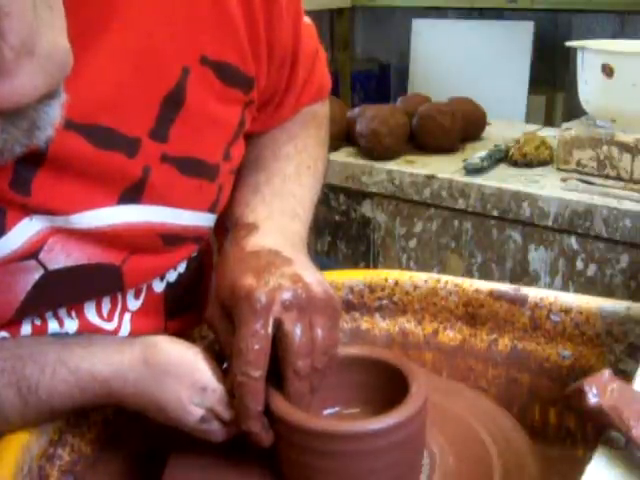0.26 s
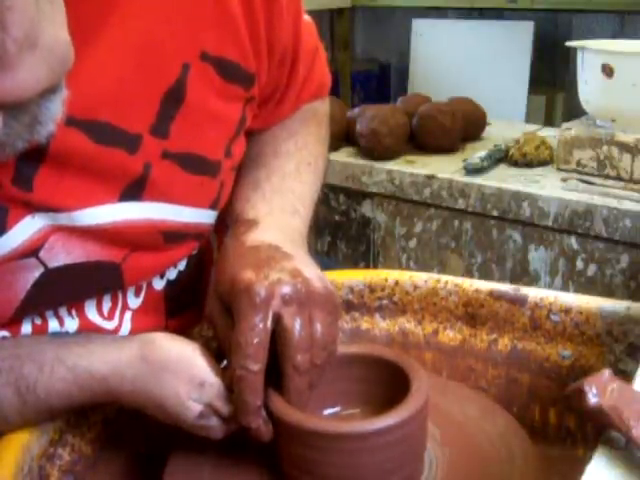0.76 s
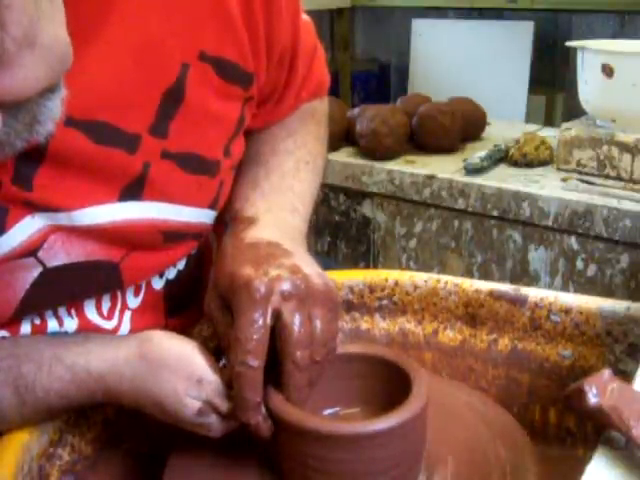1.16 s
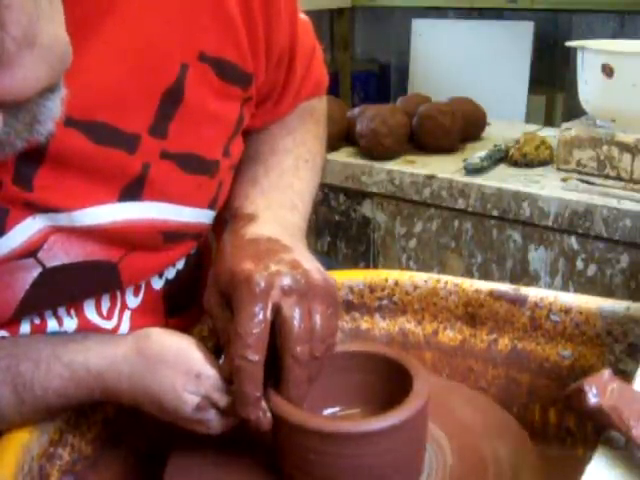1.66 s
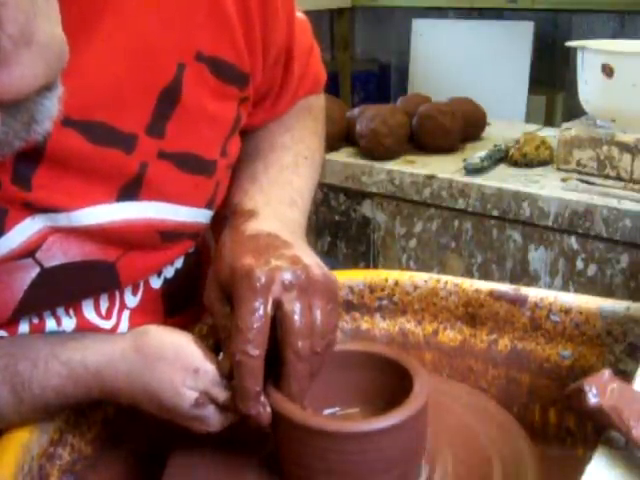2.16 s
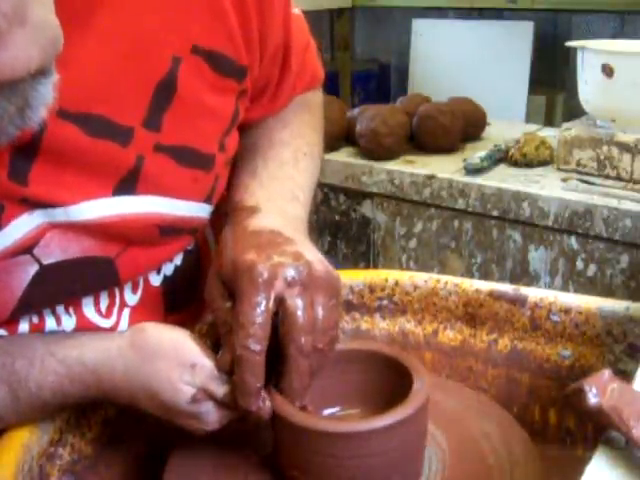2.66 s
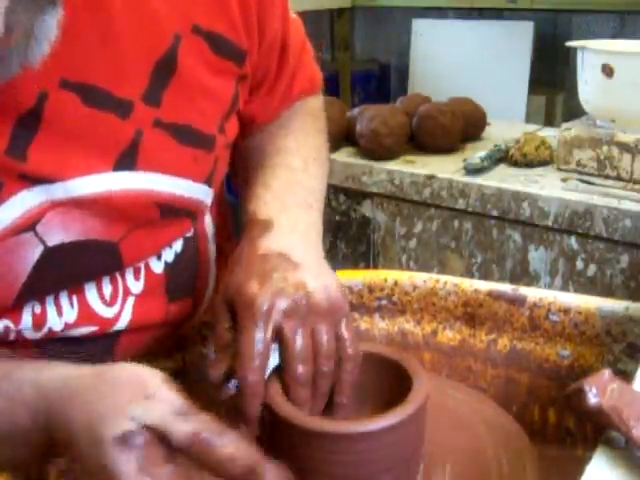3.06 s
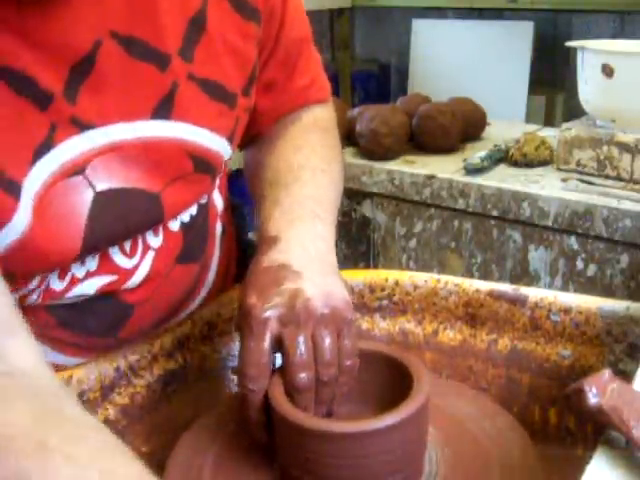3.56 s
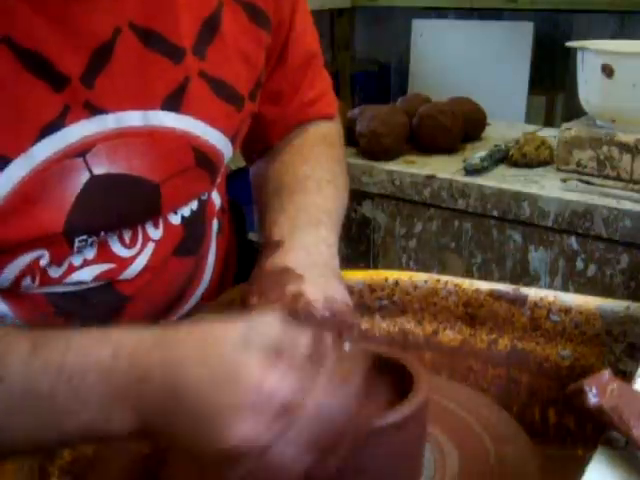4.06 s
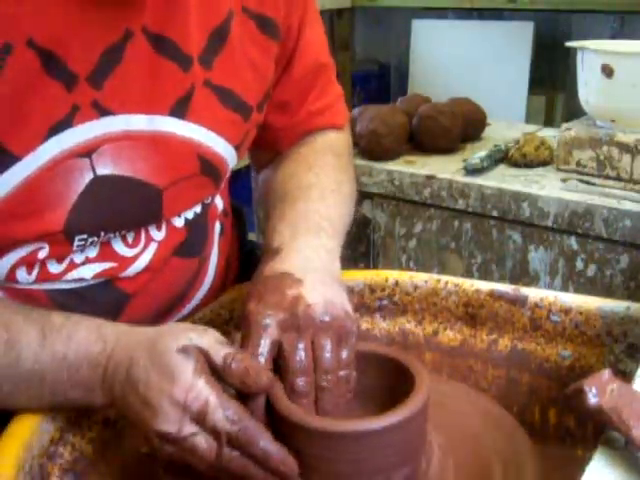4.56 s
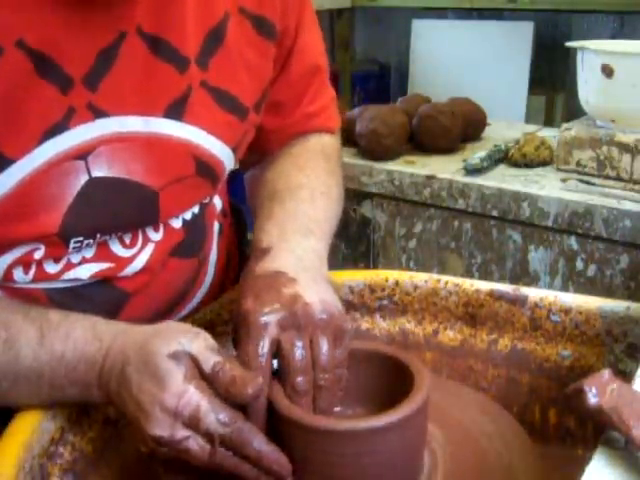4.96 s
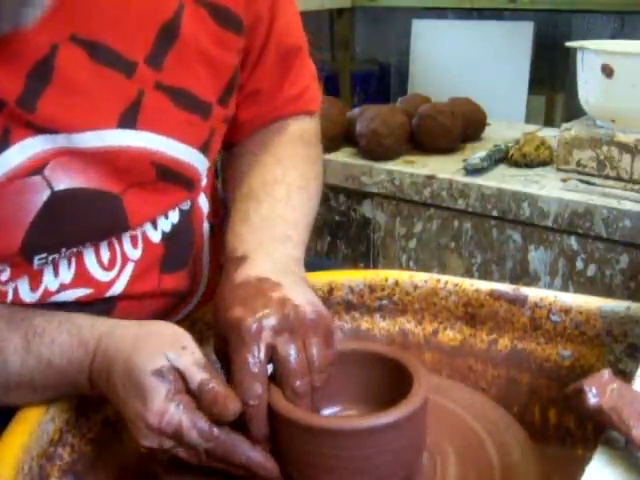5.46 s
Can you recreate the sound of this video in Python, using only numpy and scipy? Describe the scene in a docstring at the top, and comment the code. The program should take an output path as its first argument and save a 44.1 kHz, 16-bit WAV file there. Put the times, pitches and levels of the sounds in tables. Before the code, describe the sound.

A potter's wheel runs throughout: wavering mains hum, low rumble, light rapid tapping and irregular hard clacks shaking the splash pan. Small sticky snaps of wet clay appear over it, then a faint brushing stroke and a cluster of dull bumps past the middle. Hand hiss grows towards the end with a brief descending squeak. Indoor workshop air, mono, near the wheel, with limited treble.

```python
"""Pottery wheel in a small studio

An electric wheel hums on the mains (wavering sine tones) while its drive rumbles (noise through resonances).
Play in the drive makes it tap lightly and break into runs of hard knocks, each shaking the splash pan.
Soft thuds, plain smooth pushes, come about five times a second. Wet clay ticks and the arm bumps in short
noise bursts; shaped noise makes the hiss and swish of the hands and the squeaks of a changing grip."""
import sys
import numpy as np
from scipy import signal
from scipy.fft import rfft, irfft, next_fast_len
from scipy.io import wavfile
from scipy.ndimage import map_coordinates

SR = 44100
rng = np.random.default_rng(int(sys.argv[2]) if len(sys.argv) > 2 else 0)


def put_to_file(sound):
    """Save the sound as 16-bit audio at rate SR, in the file named by the first command-line argument."""
    columns = np.atleast_2d(sound).T  # one column per channel
    safe = np.clip(columns, -1, 1)
    whole_steps = np.round(safe * 32767)
    wavfile.write(sys.argv[1], SR, whole_steps.astype(np.int16))


N = 251370  # length in samples

# Steady air of the studio. Each row: frequency in Hz, relative level in dB.
AIR_COLOUR = [(20, -6), (50, -5), (72, 3.5), (92, 6.5), (125, -1), (400, -9), (600, -11), (760, -18),
              (1100, -20.5), (2000, -25), (4000, -31), (5300, -30), (7500, -33.5)]
# Dull bumps as the arm reaches over the pan. Each row: start in seconds, relative level in dB, top in Hz.
BUMPS = [(2.814, -41.5, 3600), (3.642, -40, 2600), (3.648, -36.5, 2100), (3.66, -45, 1300),
         (3.677, -42, 1900), (3.684, -39.5, 1400), (3.712, -40.5, 1300), (3.742, -43, 2420)]
# Tone colour of a bump's scuff. Each row: frequency in Hz, relative level in dB.
BUMP_COLOUR = [(30, -3), (70, -6), (300, 2), (550, 5.5), (800, 1), (1200, -0.5), (2000, -2), (3200, -5),
               (6000, -23)]
# Wet clay snapping off the fingers. Each row: start in seconds, peak of the snap in dB,
# hollow plop in dB relative to the snap before a shared trim, length of the tear in seconds.
TICKS = [(1.5815, -36.5, -6, .008), (1.78, -36, -5, .007), (1.881, -36.5, -4, .004),
         (2.121, -35.5, -6.5, 0.006), (2.2895, -35, -4, 0.0035), (2.481, -35.5, 0.5, .005),
         (2.713, -40.5, -4, .007), (2.885, -35.5, -2.5, 0.0063), (3.126, -39, 1.5, 0.0046),
         (4.269, -43, -2, .005), (4.2964, -38.5, 0, .009), (4.52, -37.5, -17, 0.0025),
         (4.6894, -28.5, -16, 0.00623), (4.8906, -38.5, -2, .004), (5.112, -33.5, -4, .012),
         (5.252, -41, 6, 0.0054), (5.4867, -29, -9, 0.005)]
# Tone colour of a tick. Each row: frequency in Hz, relative level in dB.
TICK_COLOUR = [(500, -28), (1500, -1.5), (2800, 1.5), (4000, 5.5), (5600, 1.5), (7400, 0), (9000, -23.5)]
# Pressure of the fingers on the wet wall. Each row: time in seconds, level of the hiss in dB.
FINGER_PRESSURE = [(2.62, -83), (2.85, -63.5), (3.55, -64), (3.85, -68), (4.2, -77), (4.42, -58),
                   (4.95, -59.5), (5.2, -56.5), (5.33, -53), (5.56, -54), (5.61, -55.5), (5.7, -50.5)]
# Tone colour of the hiss. Each row: frequency in Hz, relative level in dB.
SLIP_COLOUR = [(500, -2.5), (1500, 1.5), (2500, 1), (3900, 2.5), (5600, -2), (6400, -1.5), (7200, -2.5),
               (9000, -22)]
# Tone colour of the swish. Each row: frequency in Hz, relative level in dB.
SWISH_COLOUR = [(1200, -14), (2300, 3.5), (3200, -1), (3900, 2.5), (4600, -6.5), (5500, 0), (7000, -2),
                (8200, -17.5)]
# Thin squeaks of wet clay. Each row: start in seconds, length in seconds, start pitch in Hz,
# end pitch in Hz, width in Hz, level in dB.
SQUEAKS = [(2.765, .11, 3900, 4030, 200, -62.5), (2.87, .3, 4140, 4000, 260, -66.5),
           (3.15, 0.29, 4100, 3900, 220, -65), (3.439, 0.162, 3960, 3750, 220, -66.5),
           (5.29, .11, 3200, 3800, 550, -59.5), (5.44, 0.12, 4300, 4020, 300, -56.5),
           (5.638, 0.048, 6800, 7160, 550, -55)]
# One long falling squeak as the grip tightens. Each row: time in seconds, pitch in Hz, level in dB.
FALLING_SQUEAK = [(5.19, 6290, -94.5), (5.24, 6050, -57), (5.3, 5830, -53.5), (5.37, 5630, -51),
                  (5.43, 5430, -55.5), (5.5, 4990, -54), (5.545, 4105, -56), (5.577, 3780, -47),
                  (5.595, 2930, -55), (5.62, 2310, -95)]
# Motor hum. Each row: frequency in Hz, level in dB (rms, before wavering and, for the lowest, the swell).
HUM = [(100.1, -41), (200.2, -46), (300.3, -51), (400.4, -65), (500.5, -60), (600.6, -63), (700.7, -73),
       (1001, -77), (1701.7, -80.5), (1801.8, -72.5), (1901.9, -81.5), (2002, -86.5)]
# Thin whine of the motor. Each row: frequency in Hz, level in dB (rms, before wavering).
WHINE = [(5750, -85.5), (7597, -81), (8403, -91.5)]
# Slow swell of the lowest hum tone. Each row: time in seconds, change of level in dB.
HUM_SWELL = [(0, 1.5), (1.1, 0), (1.6, -1), (2.2, -1), (2.8, -3.5), (4.4, -2), (5.3, -3.5), (5.7, -2.5)]
# Soft thuds of the running wheel. Each row: middle in seconds, relative level in dB.
THUDS = [(0.048, -33), (0.319, -37), (0.543, -41), (0.718, -38), (0.847, -37), (1.05, -40), (1.195, -42),
         (1.384, -34), (1.65, -31), (1.803, -42), (2.049, -33), (2.182, -43), (2.394, -35), (2.644, -40),
         (2.928, -38), (3.056, -38), (3.384, -37), (3.517, -31), (3.657, -33), (4.019, -42), (4.186, -35),
         (4.382, -43), (4.52, -41), (4.712, -42), (4.887, -35), (5.051, -39), (5.246, -35.5), (5.393, -37),
         (5.556, -38)]
# Resonances of the housing and splash pan. Each row: frequency in Hz, width in Hz, relative level in dB.
PAN = [(162.6, 15, -9.5), (189.8, 11.1, -2.5), (250.4, 14.2, -0.5), (280.7, 21.8, -2.5), (305, 19.9, 1.5),
       (332.7, 14.9, 1.5), (387.6, 21.5, -10), (489.6, 21.8, -5), (552, 29, -24), (619, 34, -18)]
# Resonances of the drive's metal. Each row: frequency in Hz, width in Hz, relative level in dB.
METAL = [(898, 46, -5.5), (1334, 89, 2), (1508, 111, -1.5), (1791, 75, -9), (2578, 39, -14.5),
         (2880, 60, -7), (3203, 44, -7.5), (3820, 200, -17.5)]
# How hard the rolling drive shakes. Each row: time in seconds, strength in dB on its own scale.
DRIVE_SHAKE = [(0.0, -31), (0.35, -32), (0.45, -37), (1.1, -39.5), (1.17, -33), (1.38, -28.5),
               (1.47, -39.5), (1.62, -30.5), (1.74, -35.5), (2.25, -33), (2.65, -34), (2.8, -37.5),
               (3.15, -41), (3.3, -33), (3.46, -35), (3.65, -32), (4.28, -33.5), (4.6, -31), (5.3, -31),
               (5.5, -27.5), (5.7, -30.5)]
# Knocks as the drive jumps in its play. Each row: time in seconds, level of the clack in dB (rms of its
# opening), level of the zing in dB relative to the clack.
KNOCKS = [(0.0559, -46.0, -5), (0.094, -45, -12), (0.1289, -48.5, -5), (0.161, -49, -16),
          (0.2099, -50, -19), (0.2457, -48.5, -14), (0.2749, -44.5, -10), (0.316, -43, -4),
          (0.3519, -43.5, -11.5), (0.386, -54.5, -14), (0.458, -54.0, -2), (0.4838, -50.5, -4.5),
          (0.511, -51, -11), (0.707, -56, -22), (0.789, -56, -15), (0.967, -55, -8), (0.996, -53.5, -14),
          (1.1528, -49, -5.5), (1.2274, -47.5, -9), (1.262, -48.5, -6), (1.2892, -47.5, -8),
          (1.329, -44, -6), (1.3653, -45.0, -6.5), (1.393, -52, -10), (1.473, -49, -12),
          (1.508, -53.0, -18), (1.541, -52, -10), (1.5832, -47.5, -12), (1.6131, -44.5, -8.5),
          (1.708, -50.5, -17), (1.755, -52.5, -11), (1.786, -50.5, -6), (1.8271, -44.5, -11),
          (1.8625, -45.5, -9), (1.9807, -48.5, -11), (2.0236, -48, -6.5), (2.0853, -46, -10),
          (2.1173, -48.5, -8), (2.1487, -50.0, -13), (2.204, -44, -10), (2.2425, -48.0, -11),
          (2.2765, -50.5, -12), (2.356, -49.0, -8.5), (2.403, -50.5, -1), (2.4481, -48, -11),
          (2.5258, -49.5, -4), (2.569, -52, -16), (2.605, -45, -14), (2.6576, -52.5, -3),
          (2.7057, -48.5, -9), (2.7416, -48.5, -8), (2.919, -52.0, -8), (3.0807, -49.5, -10),
          (3.2013, -52.5, -11), (3.276, -52, -13), (3.3107, -49, -8), (3.418, -47, -15),
          (3.443, -50.5, -16), (3.5463, -47.5, -14), (3.5868, -49.5, -5), (3.6263, -51, -6),
          (3.713, -47.5, -5.5), (3.782, -52.5, -12), (3.906, -49.5, -12), (3.962, -49.5, -8),
          (4.0038, -48, -9), (4.0845, -45.0, -3), (4.1632, -47, -7), (4.2062, -50, -8), (4.2908, -52, -3),
          (4.3444, -48.5, -12), (4.4392, -44.5, -3.5), (4.4791, -49.5, -7), (4.5553, -50, -12),
          (4.5892, -51.0, 0), (4.63, -49.5, -11), (4.7173, -48.5, -16), (4.784, -52, -4.5),
          (4.812, -46.5, -5), (4.903, -48.5, -20), (5.086, -46, -10.5), (5.2026, -46.5, -18),
          (5.234, -55, -6), (5.3908, -45.0, -9), (5.5128, -43.5, -9), (5.5788, -48.5, -5),
          (5.6127, -47.0, -15), (5.634, -48.5, -14), (5.68, -44.5, -8)]

SWISH_S, SWISH_SPREAD_S, SWISH_DB = 3.275, 0.088, -57  # middle, spread and level of the swish
SQUEAK_ATTACK_S, SQUEAK_RELEASE_S = 0.018, 0.014
# unsteady grip: pitch scatter, level scatter, random knots a second
SQUEAK_WAVER_HZ, SQUEAK_WAVER_DB, SQUEAK_WAVER_RATE = 59.9, 2, 13
FALLING_SQUEAK_WIDTH_HZ = 430
USUAL_SHAKE_DB = -33  # ordinary running level of the drive
SHAFT_HZ, SHAFT_SCATTER_S = 27.54, .005  # turning rate, and scatter in time of the light taps
TAP_DB, TAP_SCATTER_DB = -57, 2  # light tap at the usual shake, and its spread
TAP_ZING_DB, ZING_TOP_HZ = -11.5, 3530  # zing of a light tap, and the upper edge of every zing
PAN_DB, PAN_SHARE = -30, 0.82  # pan shake at a usual knock, dB per dB of knock
RING_S = .012  # opening stretch over which a ring is levelled
TOP_HZ = 8950  # nothing is kept above this


def amp(db):
    """Turn decibels into a plain multiplier."""
    return 10 ** (np.asarray(db) / 20)


def unit(x):
    """Scale x to rms 1."""
    return x / np.sqrt(np.mean(x ** 2) + 1e-20)


def curves(rows):
    """One value per sample for each column after the time."""
    s, *columns = np.transpose(rows)
    return [np.interp(np.arange(N) / SR, s, column) for column in columns]


def wobble(rate):
    """A smooth random curve with this many knots a second."""
    knots = rng.standard_normal(int(N * rate / SR) + 4)
    return map_coordinates(knots, [np.arange(N) * rate / SR])


def filtered(x, response):
    """Shape x with a complex response of frequency."""
    m = next_fast_len(len(x) + SR // 10)  # spare room for the ring to die away
    spectrum = rfft(x, m) * response(np.fft.rfftfreq(m, 1 / SR))
    return irfft(spectrum, m)[:len(x)]


def colour(points):
    """Response through (Hz, dB) points joined on a log frequency axis."""
    hz_points, db = np.transpose(points)
    return lambda f: amp(np.interp(np.log(f + 1), np.log(hz_points), db))


def body(modes):
    """Response of an object with (Hz, width, dB) resonances, alternating in sign."""
    def response(f):
        total = 0
        for k, (hz, width, db) in enumerate(modes):
            mode = 1j * f * width / (hz * hz - f * f + 1j * f * width)
            total = total + (-1) ** k * amp(db) * mode
        return total
    return response


def noise(response):
    """Coloured noise of rms 1."""
    return unit(filtered(rng.standard_normal(N), response))


def burst(envelope, response):
    """A short rough push through a response, peak 1."""
    x = filtered(envelope * rng.standard_normal(len(envelope)), response)
    return x / np.abs(x).max()


def ring(push, response):
    """A push through a response, rms 1 over its first RING_S."""
    x = filtered(push, response)
    return x / np.sqrt(np.mean(x[:round(RING_S * SR)] ** 2))


def add(track, s, x):
    """Mix x into the track from time s on."""
    part = track[max(round(s * SR), 0):][:len(x)]
    part += x[:len(part)]


def studio_air(air_db=-44.0):
    """The steady air of the room is coloured noise."""
    return amp(air_db) * noise(colour(AIR_COLOUR))


def bumps(scuff_db=7, thump_db=5, decay_s=0.005, rise_s=0.0004, thump_decay_s=0.016,
          thump_hz=155, thump_width_hz=50, grit_db=2.5):
    """Soft contacts: a short crackly scuff over a low thump."""
    out, t = np.zeros(N), np.arange(SR // 6) / SR
    press = lambda fall_s: np.exp(-t / fall_s) * (1 - np.exp(-t / rise_s))
    thump = lambda f: body([(thump_hz, thump_width_hz, 0)])(f) ** 2
    for s, db, top_hz in BUMPS:
        grit = amp(grit_db * wobble(440)[:len(t)])
        scuff = lambda f: colour(BUMP_COLOUR)(f) / (1 + (f / top_hz) ** 10)
        add(out, s, amp(db + scuff_db) * burst(press(decay_s) * grit, scuff))
        add(out, s, amp(db + thump_db) * burst(press(thump_decay_s), thump))
    return out


def clay_ticks(plop_db=-2, snap_s=0.0009, wet_db=-12, wet_s=0.013, plop_hz=900, plop_width_hz=130):
    """A film of slip tears in three tiny snaps, and the pocket behind it plops."""
    out, t = np.zeros(N), np.arange(SR // 20) / SR
    pocket = body([(plop_hz, plop_width_hz, 0)])
    for s, db, hollow_db, length in TICKS:
        starts = 0.0012 + np.array([0, rng.uniform(.3, .7), 1]) * length
        snaps = sum((t >= at) * np.exp(-np.abs(t - at) / snap_s) for at in starts)
        tear = snaps + amp(wet_db) * np.exp(-t / wet_s)
        add(out, s, amp(db) * burst(tear, colour(TICK_COLOUR)))
        add(out, s, amp(db + hollow_db + plop_db) * burst(tear, pocket))
    return out


def squeal(hz, width_hz, skirt_db=-8, skirt_wider=3.9):
    """A narrow band of noise around a moving pitch, on a wider skirt of scraping."""
    phase = 2 * np.pi * np.cumsum(hz) / SR
    hump = lambda f, width: 1 / (1 + (f / width) ** 2)

    def band():
        core = noise(lambda f: hump(f, width_hz))
        skirt = noise(lambda f: hump(f, skirt_wider * width_hz) ** 2)
        return core + amp(skirt_db) * skirt
    # low noise riding on two waves a quarter turn apart moves up around the pitch
    return band() * np.cos(phase) + band() * np.sin(phase)


def squeaks():
    """Gritty squeaks of wet clay glide in pitch as the grip changes."""
    out, t = np.zeros(N), np.arange(N) / SR
    for s, length, start_hz, end_hz, width_hz, db in SQUEAKS:
        hz = start_hz + (end_hz - start_hz) * np.clip((t - s) / length, 0, 1)
        attack = np.clip((t - s) / SQUEAK_ATTACK_S, 0, 1)
        release = np.clip((s + length - t) / SQUEAK_RELEASE_S, 0, 1)
        waver = unit(amp(SQUEAK_WAVER_DB * wobble(SQUEAK_WAVER_RATE)))
        unsteady_hz = hz + SQUEAK_WAVER_HZ * wobble(SQUEAK_WAVER_RATE)
        out += amp(db) * attack * release * waver * squeal(unsteady_hz, width_hz)
    falling_hz, falling_db = curves(FALLING_SQUEAK)
    return out + amp(falling_db) * squeal(falling_hz, FALLING_SQUEAK_WIDTH_HZ)


def fingers(grain_db=2.0):
    """Wet clay hisses under the hands, swishes as the inner one slides deeper into the bowl, and squeaks."""
    t = np.arange(N) / SR
    grit = unit(amp(grain_db * wobble(220)))
    hiss = amp(curves(FINGER_PRESSURE)[0]) * noise(colour(SLIP_COLOUR))
    stroke = np.exp(-((t - SWISH_S) / SWISH_SPREAD_S) ** 2 / 2)
    swish = amp(SWISH_DB) * stroke * noise(colour(SWISH_COLOUR))
    return grit * (hiss + swish + squeaks())


def motor(waver_db=1.5, drift_rad=0.036):
    """Magnetic hum at multiples of twice the mains rate, with a faint whine."""
    t = np.arange(N) / SR

    def tone(hz, db):
        level = amp(db + waver_db * wobble(3.5))
        phase = 2 * np.pi * (hz * t + rng.random()) + drift_rad * wobble(2.6)
        return level * np.sqrt(2) * np.sin(phase)
    lowest, *upper = [tone(hz, db) for hz, db in HUM + WHINE]
    return amp(curves(HUM_SWELL)[0]) * lowest + sum(upper)


def thuds(level_db=4, width_s=0.0028, lowest_hz=22):
    """About five times a second the wheel gives one soft push with no ring."""
    out, t = np.zeros(N), np.arange(SR // 20) / SR
    middle = t.mean()
    push = np.exp(-((t - middle) / width_s) ** 2)
    for s, db in THUDS:
        add(out, s - middle, -amp(db + level_db) * push)
    return filtered(out, lambda f: 1j * f / (lowest_hz + 1j * f))  # trims the very lowest part


def rolling(rumble_db=-39.5, rumble_grows=0.83, chatter_db=-60.5, chatter_grows=0.77, load_db=-5,
            rough_db=4.0, skirt_hz=590):
    """The turning drive rumbles in the pan and its metal chatters, the chatter more so under the hands' load."""
    shake_db = curves(DRIVE_SHAKE)[0] - USUAL_SHAKE_DB
    rumble = noise(lambda f: body(PAN)(f) / (1 + (f / skirt_hz) ** 6))
    chatter = unit(noise(body(METAL)) * amp(rough_db * wobble(70)))
    shaken = amp(chatter_db + chatter_grows * shake_db)
    loaded = amp(curves(FINGER_PRESSURE)[0] + load_db)
    return amp(rumble_db + rumble_grows * shake_db) * rumble + np.hypot(shaken, loaded) * chatter


def knocks():
    """(s, clack dB, zing dB) of every contact: hard knocks, and light taps between them that follow the shaking."""
    turns = np.arange(0, N / SR, 1 / SHAFT_HZ)
    late, strong = rng.standard_normal((len(turns), 2)).T
    times = turns + SHAFT_SCATTER_S * late
    shake_db = np.interp(times, *np.transpose(DRIVE_SHAKE)) - USUAL_SHAKE_DB
    levels = TAP_DB + shake_db + TAP_SCATTER_DB * strong
    nearest_knock = np.abs(times[:, None] - np.array(KNOCKS)[:, 0]).min(axis=1)
    free = nearest_knock > .6 / SHAFT_HZ  # no tap close to a hard knock
    return list(KNOCKS) + [(s, db, TAP_ZING_DB) for s, db in zip(times[free], levels[free])]


def rattle(pan_hz=470, rebound_s=.0056, rebound_db=-2.5, soft_hz=1700, lead_s=0.001298,
           buzz_s=0.0037, buzz_db=-13, crack_db=-16, crack_hz=2600, crack_width_hz=1400, detune=.007,
           usual_db=-48, settle_s=.016, settle_db=-30, swell_s=.0078,
           split_hz=2100, lag_hz=1260, lag_width_hz=260, bottom_hz=1150):
    """Each knock is a clack that sinks in pitch as it rebounds, with a rough zing; the heavy pan swells after it."""
    out, t = np.zeros(N), np.arange(SR // 7) / SR
    pan_push = t / swell_s * np.exp(-t / swell_s)
    contact = signal.unit_impulse(len(t))
    pan = lambda f: body(PAN)(f) / (1 + (f / pan_hz) ** 6)
    below = lambda f, hz: 1 / (1 + (f / hz) ** 14)
    # slow bending waves: the lowest part of the ring arrives last
    lag = lambda f: 1 - 2 * body([(lag_hz, lag_width_hz, 0)])(f)
    crack = lambda f: amp(crack_db) * body([(crack_hz, crack_width_hz, 0)])(f) ** 2
    rough_tail = lambda db, fall_s: amp(db) * np.exp(-t / fall_s) * rng.standard_normal(len(t))
    for s, db, zing_db in knocks():
        # no two contacts land alike, so the modes ring at new strengths and slightly new pitches
        metal = body([(hz * (1 + detune * rng.standard_normal()), width, level + rng.normal(0, 2))
                      for hz, width, level in METAL])
        gap_s = rebound_s * rng.lognormal(0, .16)
        # the rebound is a second, softer contact after the gap
        bounce = lambda f: 1 + amp(rebound_db) * np.exp(-2j * np.pi * f * gap_s) * below(f, soft_hz)
        clack_band = lambda f: below(f, split_hz) - below(f, bottom_hz)
        zing_band = lambda f: below(f, ZING_TOP_HZ) - below(f, split_hz)
        settling = contact + rough_tail(settle_db, settle_s)
        buzzing = contact + rough_tail(buzz_db, buzz_s)
        clack = ring(settling, lambda f: metal(f) * bounce(f) * lag(f) * clack_band(f))
        zing = ring(buzzing, lambda f: (metal(f) + crack(f)) * zing_band(f))
        add(out, s - lead_s, amp(db) * (clack + amp(zing_db) * zing))
        shake = amp(PAN_DB + PAN_SHARE * (db - usual_db))
        add(out, s, shake * burst(pan_push, pan))
    return out


def scene():
    """The wheel, the hands and the studio, heard from one spot."""
    hands = bumps() + clay_ticks() + fingers()
    wheel = motor() + thuds() + rolling() + rattle()
    return (studio_air() + hands + wheel)[None]


def record(dry, knee_hz=8000, notch_hz=4720, notch_width_hz=120, notch_db=-7.5):
    """The microphone has one narrow dip; the recorder rolls off towards its band limit."""
    dip = lambda f: amp(notch_db / (1 + ((f - notch_hz) / notch_width_hz) ** 2))
    roll_off = lambda f: (f < TOP_HZ) / np.sqrt(1 + (f / knee_hz) ** 50)
    return filtered(dry[0], lambda f: dip(f) * roll_off(f))[None]


dry = scene()
out = record(dry)
put_to_file(out)
```